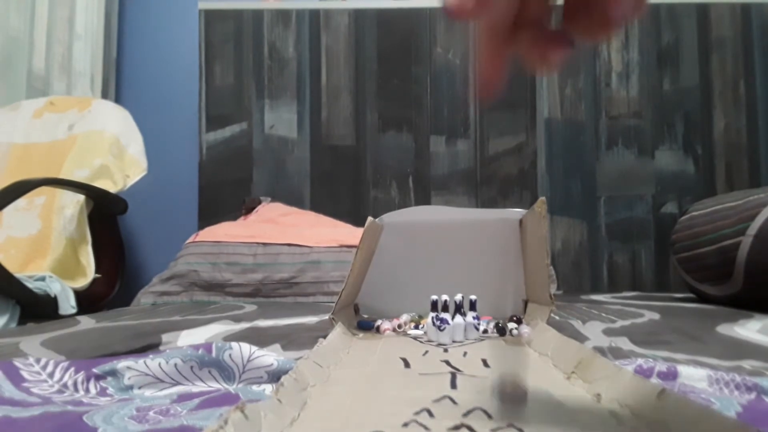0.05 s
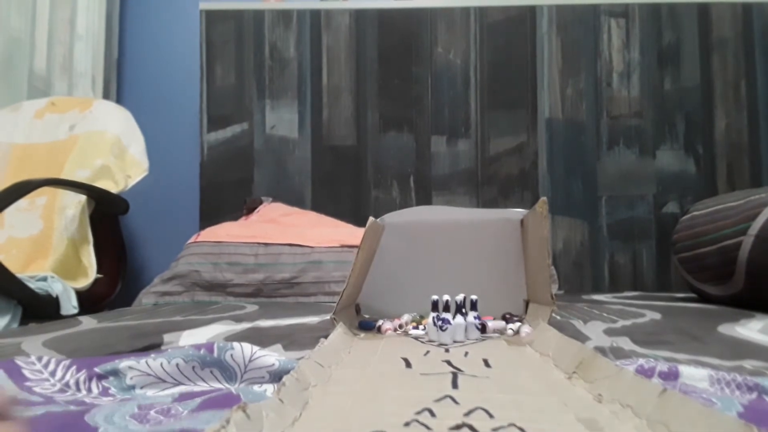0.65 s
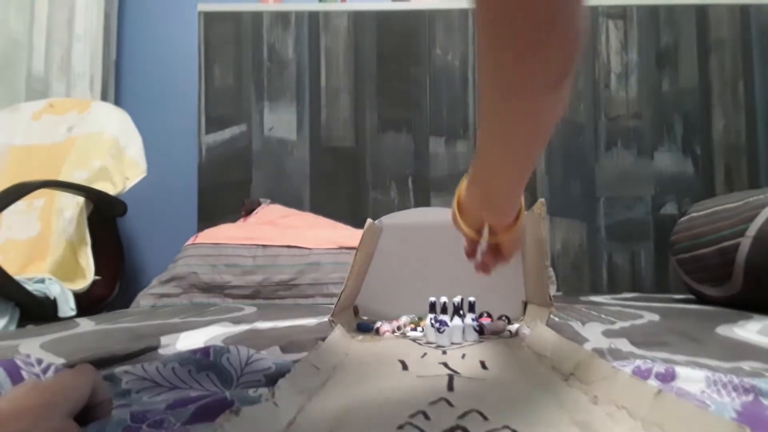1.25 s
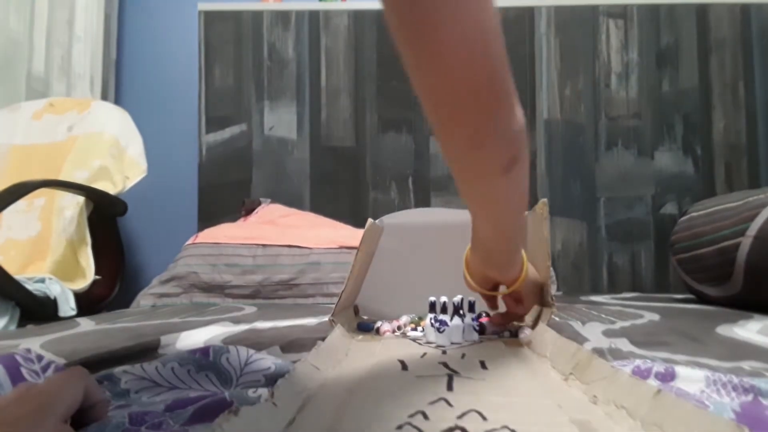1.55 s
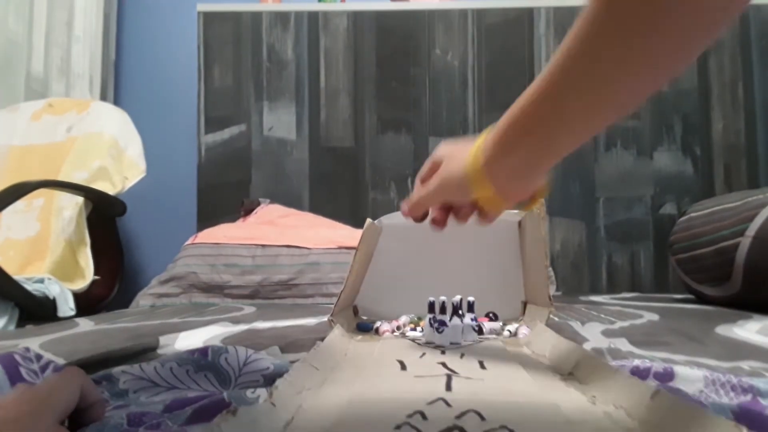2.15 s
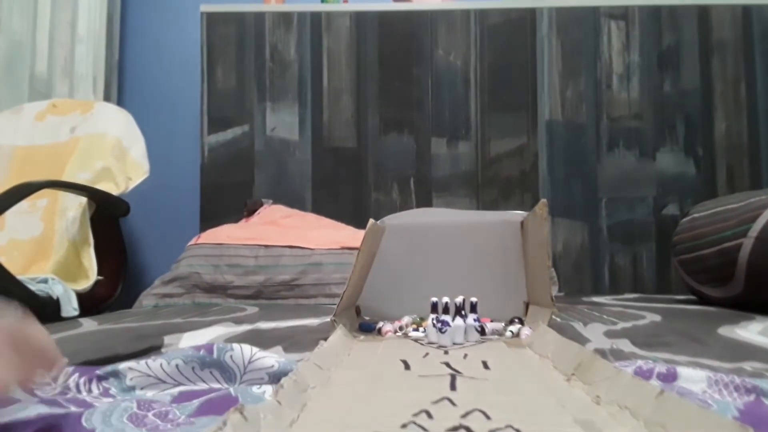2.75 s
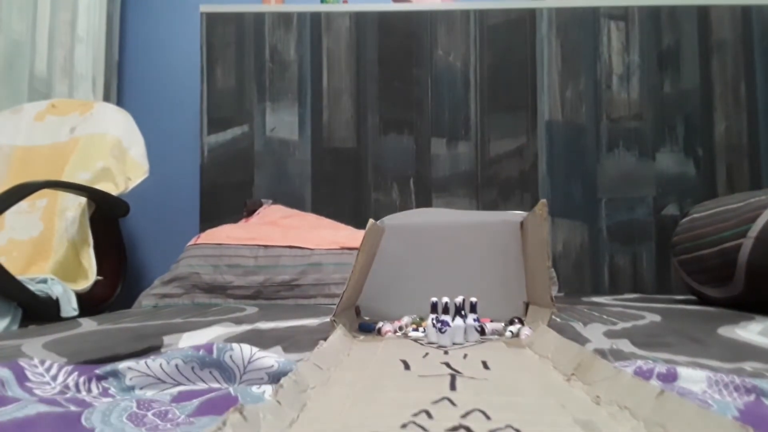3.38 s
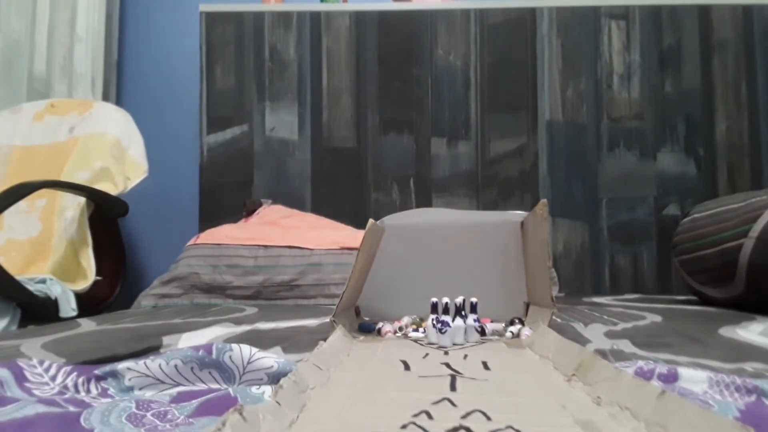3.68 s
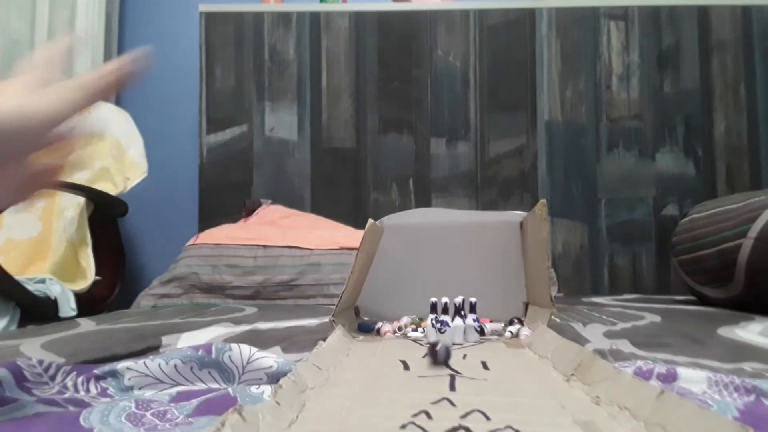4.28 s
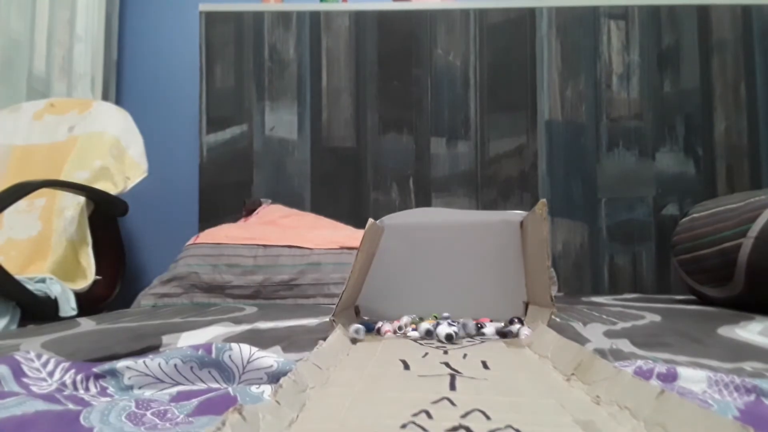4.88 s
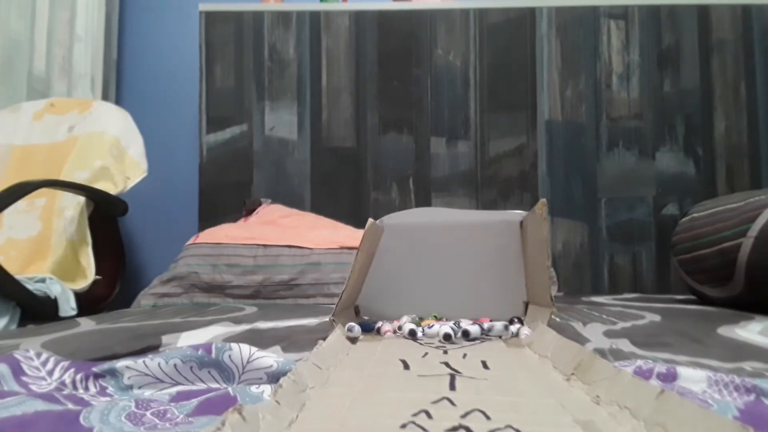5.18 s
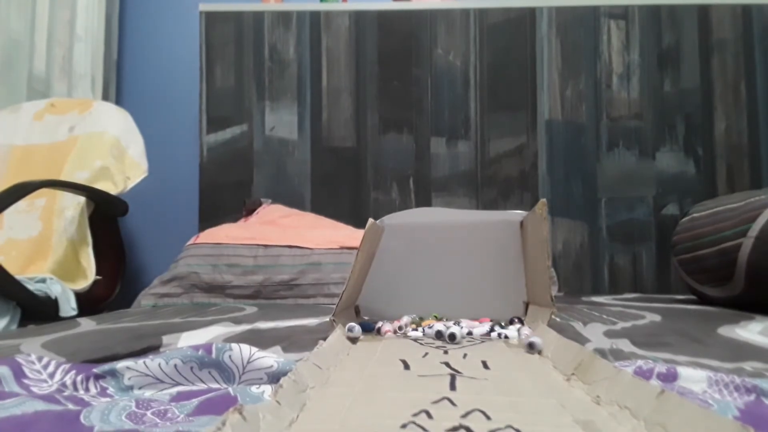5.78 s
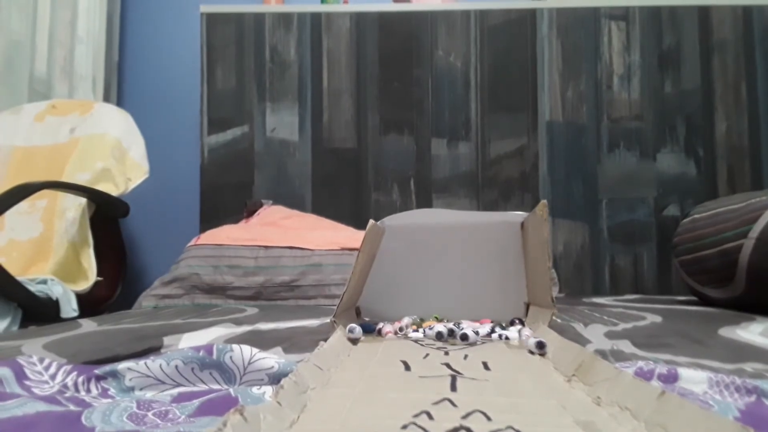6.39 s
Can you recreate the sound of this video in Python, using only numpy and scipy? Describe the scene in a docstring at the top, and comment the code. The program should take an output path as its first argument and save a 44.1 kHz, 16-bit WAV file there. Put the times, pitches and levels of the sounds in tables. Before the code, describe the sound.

Toy bowling on a bed: hollow cardboard thuds and rattling toys, soft sheet rustles, then a small ball rolls and knocks over miniature pins.

```python
"""Small room, toy bowling in a cardboard box on a bed. A ball thumps into the box, bending the board
and rattling small toys; a hand fetching it bumps the loose side wall. The ball then bounces and rolls
down the lane and scatters tiny ringing pins. The sheet rustles and the mattress gives under shifting
weight. Horns and a thin call sound far outside, over low room noise and hum.
The microphone's port has a sharp treble resonance."""
import sys
import numpy as np
from scipy import signal
from scipy.fft import rfft, irfft, next_fast_len
from scipy.io import wavfile
from scipy.ndimage import map_coordinates

SR = 44100
rng = np.random.default_rng(int(sys.argv[2]) if len(sys.argv) > 2 else 0)


def transcribe(signal):
    """Save signal, clipped to [-1, 1], as a 16-bit WAV file at the path in sys.argv[1]."""
    frames = np.atleast_2d(signal).T
    limited = np.clip(frames, -1, 1)
    pcm = np.round(limited * 32767).astype(np.int16)
    wavfile.write(sys.argv[1], SR, pcm)


N = 283563
TIME_S = np.arange(N) / SR
AGE_S = np.arange(SR // 2) / SR  # time since a blow

# noise spectra of room, cloth and mattress: (frequency [Hz], relative density [dB])
AIR_SPECTRUM = [(20, -25.5), (60, -13.5), (100, -4), (130, -6), (190, -7), (400, -6), (700, -15.5),
                (1300, -21), (2700, -32), (5000, -52.5), (8500, -41), (12000, -53.5)]
CLOTH_SPECTRUM = [(100, -4), (250, 13.5), (550, 9.5), (1100, 9), (2400, 3.5), (4000, -2), (6000, -7),
                  (8500, -3), (11000, -8.5), (15500, -5.5)]
MATTRESS_SPECTRUM = [(20, -24), (55, -4), (150, 3.5), (300, -4), (600, -10), (1500, -50)]
# room hum: (frequency [Hz], level [dB])
HUM_TONES = [(100, -59.5), (186, -63.5)]
# moves on the bed: (peak time [s], cloth [dB], mattress [dB], mattress lead [s], rise [dB/s], fall [dB/s])
BED_SHIFTS = [(.68, -45, -48.5, 0.025, 30, 16), (2.72, -50.5, -46, 0.087, 54, 60.5),
              (4.15, -61, -51, -0.029, 75, 46), (5.77, -51.5, -50.5, -0.1, 31.5, 37.5)]
# cardboard modes: (frequency [x pitch], level at 4 cycles [dB], t60 [x nominal])
CARDBOARD_MODES = [(.52, -10, 1.1), (1, 1, 0.79), (1.5, -9.5, 0.7), (2.9, -10.5, 0.39)]
# blows on the box, more echo from deep inside: (time [s], thud [dB], pitch [Hz], crack [dB], echo [dB])
BOX_KNOCKS = [(0.1409, -3.5, 310, -7.5, -2.5), (0.2316, -12.5, 395, -10, -11.5),
              (0.251, -14.5, 407, -25.5, -4.5), (0.321, -16.5, 290, -29, 0.5),
              (0.449, -19.5, 467, -32, 9.5), (0.548, -12, 403, -37.5, 1), (1.035, -30.5, 394, -38, 3),
              (1.456, -24, 320, -47, -2), (1.805, -21.5, 700, -45, 0), (1.882, -27.5, 770, -42, 2),
              (4.1059, -8.5, 465, -13, -4), (4.122, -14, 412, -38.5, -2), (4.1546, -19, 357, -36, -7.5),
              (4.171, -17.5, 320, -27, -18), (4.36, -19, 420, -34, -5.5), (4.402, -20.5, 307, -48, -8),
              (4.4447, -18, 390, -34.5, -5), (4.57, -17.5, 335, -28, -5), (4.693, -25, 700, -26.5, 0.5),
              (4.796, -22, 364, -43.5, -4), (4.981, -25.5, 403, -27, 4)]
# mattress bumps: (time [s], level [dB], frequency [Hz])
BED_BUMPS = [(0.1439, -7.5, 170), (0.461, -25, 170), (1.16, -29, 172), (1.456, -23, 149), (2.556, -28, 140),
             (2.595, -34.5, 62), (4.526, -24, 128), (5.911, -32.5, 76)]
# ticks with no ring: (time [s], level [dB])
DRY_TICKS = [(0.281, -27), (0.36, -27.5), (0.383, -25.5), (0.6242, -9.5), (0.6575, -19.5), (0.7587, -20),
             (2.6859, -21), (2.8139, -20.5), (3.458, -38.5), (4.0893, -29.5), (4.265, -23.5),
             (4.602, -20.5), (5.311, -35), (5.361, -40.5), (5.761, -27.5)]
# toy collisions at the back of the box: (time [s], crack [dB], ring [dB])
TOY_CLICKS = [(0.4358, -15.5, -24.5), (0.449, -11, -31), (0.4592, -4, -35), (0.472, -11, -31),
              (0.491, -22, -35), (0.517, -11.5, -23.5), (1.674, -43, -49), (1.7463, -31.5, -43),
              (1.8302, -27, -49)]
# toy modes: (frequency [Hz], level [dB], t60 [s])
TOY_RING_MODES = [(3156, -12, 0.062), (4360, -12.5, .015), (6460, -6.5, .02), (6430, -9.5, 0.03),
                  (7700, -23, .009)]
# far horn partials: (start [s], length [s], frequency [Hz], level [dB])
HORN_PARTIALS = [(1.36, .26, 1640, -65), (1.28, .3, 2487, -65), (5.41, .3, 522, -62),
                 (5.41, .22, 1066, -59), (5.36, .32, 2019, -63), (5.35, .32, 2245, -61)]
# hand on the side wall: (time [s], level [dB], pitch [Hz])
HAND_TAPS = [(1.939, -23.5, 590), (1.961, -31, 475), (2.012, -32, 530)]
# ball, then a fallen pin, bouncing: (start [s], level [dB], pitch [Hz], first flight [s], loss [dB/bounce])
BOUNCE_RUNS = [(4.202, -14, 323, .034, 2.75), (5.118, -34.5, 764, .044, 3.5)]
# pins struck or falling on each other: (time [s], crack [dB], ring [dB])
PIN_HITS = [(4.4631, -8, -27), (4.472, -14.5, -27), (4.4847, -25, -31.5), (4.5181, -13, -31),
            (4.5215, -15, -40), (4.68, -30.5, -52.5), (4.693, -46, -48), (4.755, -45, -54),
            (4.8097, -29.5, -44), (4.841, -39, -51.5), (4.888, -28, -37), (4.91, -38, -40.5),
            (4.9881, -25.5, -38), (5.2942, -35, -51.5)]
# pin modes: (frequency [x pitch], level [dB], t60 [x nominal])
PIN_RING_MODES = [(1, 5, 1.24), (.984, -17, .5), (.93, -2.5, 0.26)]


def amp(db):
    """Decibels to gain."""
    return 10 ** (np.asarray(db) / 20)


def unit_rms(x):
    """Scale to rms 1."""
    return x / np.sqrt(np.mean(x ** 2) + 1e-20)


def decay(t60_s):
    """Exponential decay after a blow."""
    return np.exp(-np.log(1000) * AGE_S / max(t60_s, 1e-4))


def mode(hz, db, t60_s):
    """Damped sine."""
    return amp(db) * np.sin(2 * np.pi * hz * AGE_S) * decay(t60_s)


def filtered(x, response):
    """Apply a complex frequency response."""
    size = next_fast_len(len(x) + SR // 8)
    return irfft(rfft(x, size) * response(np.fft.rfftfreq(size, 1 / SR)), size)[:len(x)]


def noise(spectrum):
    """Coloured noise, rms 1."""
    knots_hz, knots_db = np.transpose(spectrum)
    gain = lambda hz: amp(np.interp(np.log(hz + 1), np.log(knots_hz), knots_db))
    return unit_rms(filtered(rng.standard_normal(N), gain))


def wobble(rate_hz):
    """Smooth random curve, rate_hz knots a second."""
    return map_coordinates(rng.standard_normal(int(N * rate_hz / SR) + 4), [TIME_S * rate_hz])


def add(track, at_s, sound):
    """Mix a sound in at a given time."""
    rest = track[round(at_s * SR):][:len(sound)]
    rest += sound[:len(rest)]


def in_room(x, near_db, tail_db, t60_s, gap_s=0.0056):
    """Direct sound, near-wall scatter and room tail, new for each spot."""
    near_t60_s = 0.097
    onset = np.clip(AGE_S / gap_s - 1, 0, 1)
    echo = np.zeros(len(AGE_S))
    for db, life_s in (near_db, near_t60_s), (tail_db, t60_s):
        scatter = rng.standard_normal(len(AGE_S)) * decay(life_s) * onset
        echo += amp(db) * scatter / np.linalg.norm(scatter)
    return x + signal.fftconvolve(x, echo)[:len(x)]


def room_tone():
    """Low room noise, unsteady hum."""
    hum = sum(amp(db + 1.7 * wobble(5.1)) * np.sin(2 * np.pi * hz * TIME_S + wobble(11))
              for hz, db in HUM_TONES)
    return amp(-59.5) * noise(AIR_SPECTRUM) * amp(2.4 * wobble(14)) + hum


def bed_rustle():
    """Cloth slides with a fine hiss, mattress gives in lumps; one effort drives both."""
    cloth = unit_rms(noise(CLOTH_SPECTRUM) * amp(0.79 * wobble(220)))
    mattress = unit_rms(noise(MATTRESS_SPECTRUM) * amp(4.5 * wobble(25)))
    out = np.zeros(N)
    for at_s, cloth_db, mattress_db, lead_s, rise_db_s, fall_db_s in BED_SHIFTS:
        effort_db = lambda peak_s: np.minimum(rise_db_s * (TIME_S - peak_s), fall_db_s * (peak_s - TIME_S))
        out += amp(cloth_db + effort_db(at_s)) * cloth
        out += amp(mattress_db + 0.71 * effort_db(at_s - lead_s)) * mattress
    return out


def thud(hz, cycles):
    """Cardboard gives, then swings; more cycles, purer note."""
    purity = np.sqrt(max(cycles, 1) / 4)
    swing = sum(mode(hz * ratio, db * purity, life * cycles / hz) for ratio, db, life in CARDBOARD_MODES)
    give = 1 - decay(t60_s=.0015)
    radiation = signal.butter(4, 135, "high", fs=SR)  # a small sheet radiates no deep bass
    return -signal.lfilter(*radiation, swing * give)


def crack(low_hz, high_hz, grit, t60_s):
    """Hard contact, energy 1: pulse plus gritty scrape, rounded by the contact time."""
    scrape = rng.standard_normal(len(AGE_S)) * decay(t60_s)
    pulse = grit * scrape / np.linalg.norm(scrape)
    pulse[0] += 1
    flat_spectrum = np.exp(1j * np.angle(rfft(pulse)))  # no pitch
    pulse = irfft(flat_spectrum, len(AGE_S)) * decay(10 * t60_s)
    pulse = signal.lfilter(*signal.butter(2, low_hz, "high", fs=SR), pulse)
    pulse = signal.lfilter(*signal.butter(1, high_hz, fs=SR), pulse)
    return pulse / np.linalg.norm(pulse)


def box_knocks():
    """Blows bend the board at a pitch set by the spot; harder ones swing longer."""
    ref_db, doubling_db = -24, 22.5
    out = np.zeros(N)
    for at_s, db, hz, crack_db, echo_db in BOX_KNOCKS:
        knock = amp(db) * thud(hz, cycles=3.18 * 2 ** ((db - ref_db) / doubling_db))
        add(out, at_s, in_room(knock, near_db=echo_db - 4, tail_db=echo_db, t60_s=0.46, gap_s=0.004))
        contact = amp(crack_db) * crack(low_hz=750, high_hz=7000, grit=1.8, t60_s=.013)
        add(out, at_s, in_room(contact, near_db=echo_db - 7.5, tail_db=echo_db, t60_s=0.29))
    return out


def bed_bumps():
    """Weight lands on the bed: a soft, deep push."""
    cycles, rise_t60_s = 4.2, .015
    out = np.zeros(N)
    for at_s, db, hz in BED_BUMPS:
        push = -mode(hz, db, cycles / hz) * (1 - decay(rise_t60_s))
        add(out, at_s, in_room(push, near_db=-12.5, tail_db=-18, t60_s=.35))
    return out


def ticks():
    """Small dry snaps near the microphone."""
    out = np.zeros(N)
    for at_s, db in DRY_TICKS:
        snap = amp(db) * crack(low_hz=3500, high_hz=11000, grit=1.1, t60_s=.011)
        add(out, at_s, in_room(snap, near_db=-12.5, tail_db=-9, t60_s=0.39))
    return out


def toys():
    """Toys chatter together; size detunes each short ring."""
    detunes = 1 + .012 * rng.uniform(-0.54, 1, len(TOY_CLICKS))
    out = np.zeros(N)
    for (at_s, crack_db, ring_db), detune in zip(TOY_CLICKS, detunes):
        ring = sum(mode(hz * detune, db, t60_s) for hz, db, t60_s in TOY_RING_MODES)
        chatter = crack(low_hz=2800, high_hz=9000, grit=1.6, t60_s=.014)
        click = amp(ring_db) * ring + amp(crack_db) * chatter
        add(out, at_s, in_room(click, near_db=-6, tail_db=-7, t60_s=.33))
    return out


def distant_call():
    """Thin call outside, highest where loudest, smeared by echoes."""
    middle_s, length_s, low_hz, top_hz = .755, .26, 1113, 1670
    arch = np.cos(np.pi * np.clip((TIME_S - middle_s) / length_s, -.5, .5))
    hz = low_hz + (top_hz - low_hz) * arch ** 2
    phase = 2 * np.pi * np.cumsum(hz * (1 + 0.017 * wobble(210))) / SR
    return in_room(amp(-52) * arch * np.sin(phase), near_db=-1, tail_db=-16, t60_s=0.19)


def horns():
    """Far horns: rough, fluttering partials swell and fade."""
    out = np.zeros(N)
    for start_s, length_s, hz, db in HORN_PARTIALS:
        swell = np.sin(np.pi * np.clip((TIME_S - start_s) / length_s, 0, 1))
        flutter = amp(3 * wobble(60))
        tone = np.sin(2 * np.pi * hz * TIME_S + .8 * wobble(70))
        out += amp(db) * swell * unit_rms(flutter * tone)
    return out


def side_wall():
    """A hand bumps the loose wall; it rings purer and longer than the lane."""
    out = np.zeros(N)
    for at_s, db, hz in HAND_TAPS:
        contact = amp(-15) * crack(low_hz=750, high_hz=7000, grit=1.5, t60_s=0.014)
        tap = amp(db) * (thud(hz, cycles=20.7) + contact)
        add(out, at_s, in_room(tap, near_db=-10, tail_db=-4.5, t60_s=0.34))
    return out


def rolling(count=64):
    """Ball and fallen pins tap the lane's ribs and dents unevenly, softer as they slow."""
    start_s, length_s, start_db, loss_db_s = 4.11, 0.97, -22, 12.5
    front_hz, back_hz = 335, 534  # the board is stiffer at the back
    out = np.zeros(N)
    for k, (late, softness, spot) in enumerate(rng.random((count, 3))):
        progress = (k + late) / count
        elapsed_s = progress * length_s
        hz = (front_hz + progress * (back_hz - front_hz)) * 2 ** (spot - .5)
        db = start_db - loss_db_s * elapsed_s - 10 * softness
        contact = amp(-9.5) * crack(low_hz=900, high_hz=1800, grit=1, t60_s=0.0045)
        add(out, start_s + elapsed_s, amp(db) * (thud(hz, cycles=5.7) + contact))
    return in_room(out, near_db=-16, tail_db=-2, t60_s=0.54)


def bouncing(count=9, flight_ratio=.86):
    """Each bounce is weaker and sooner; the open lane gives little echo."""
    out = np.zeros(N)
    for start_s, db, hz, flight_s, loss_db in BOUNCE_RUNS:
        for k, spot in enumerate(rng.standard_normal(count)):
            landing_s = start_s + flight_s * (1 - flight_ratio ** k) / (1 - flight_ratio)
            contact = amp(-10.5) * crack(low_hz=750, high_hz=7000, grit=4.6, t60_s=0.029)
            tap = thud(hz * 2 ** (0.19 * spot), cycles=6.8) + contact
            add(out, landing_s, amp(db - loss_db * k) * tap)
    return in_room(out, near_db=-11, tail_db=-14.5, t60_s=0.3)


def pins():
    """Tiny hard pins clink on one high note and tap the lane; hard blows choke the ring."""
    note_hz, choked_t60_s, doubling_db = 8967, 0.0073, 14
    pitches_hz = note_hz * (1 + 0.0041 * rng.uniform(-2.1, 1.5, len(PIN_HITS)))
    out = np.zeros(N)
    for (at_s, crack_db, ring_db), hz in zip(PIN_HITS, pitches_hz):
        t60_s = choked_t60_s * 2 ** (-crack_db / doubling_db)
        ring = sum(mode(hz * ratio, db, t60_s * life) for ratio, db, life in PIN_RING_MODES)
        contact = crack(low_hz=3400, high_hz=9500, grit=0.99, t60_s=0.012)
        lane_tap = amp(-31.5 + 0.175 * crack_db) * thud(hz=1044, cycles=8)
        add(out, at_s, in_room(amp(ring_db) * ring, near_db=-6.5, tail_db=-6, t60_s=0.39))
        add(out, at_s, in_room(amp(crack_db) * contact, near_db=-9, tail_db=-10, t60_s=0.13))
        add(out, at_s, in_room(lane_tap, near_db=-5.5, tail_db=-3, t60_s=0.46))
    return out


def scene():
    """Mono sum at the microphone."""
    game = box_knocks() + side_wall() + bouncing() + pins() + toys() + ticks() + rolling()
    return (game + bed_rustle() + bed_bumps() + horns() + distant_call() + room_tone())[None]


def record(dry):
    """Microphone port resonance and hard band limit."""
    port_hz, q, limit_hz = 8500, 9, 15900
    port = lambda hz: (hz < limit_hz) / (1 - (hz / port_hz) ** 2 + 1j * hz / (port_hz * q))
    return filtered(dry[0], port)[None]


dry = scene()
out = record(dry)
transcribe(out)
```